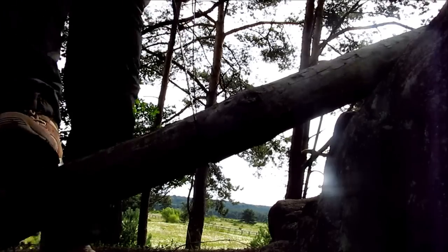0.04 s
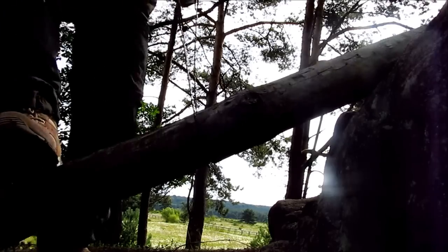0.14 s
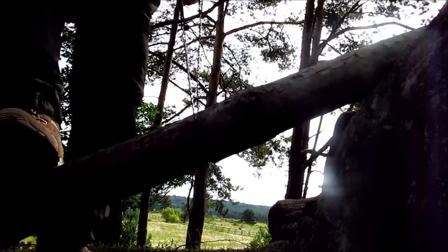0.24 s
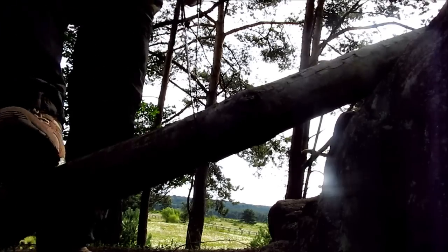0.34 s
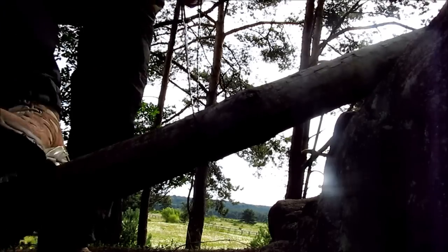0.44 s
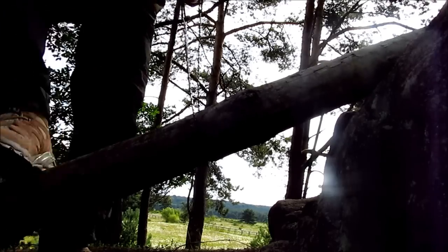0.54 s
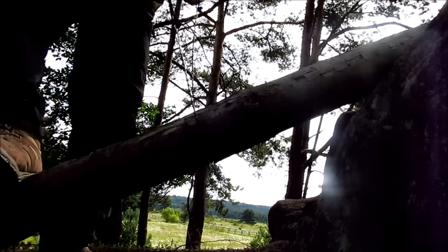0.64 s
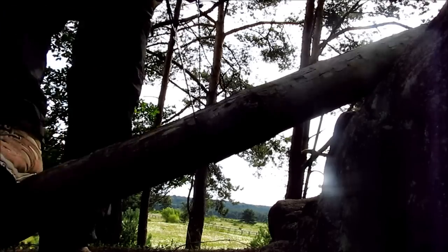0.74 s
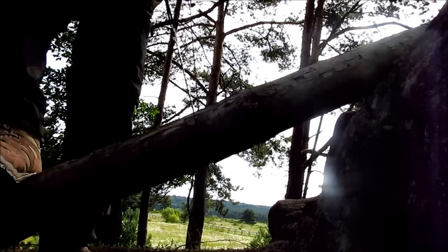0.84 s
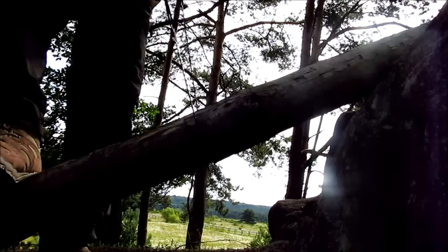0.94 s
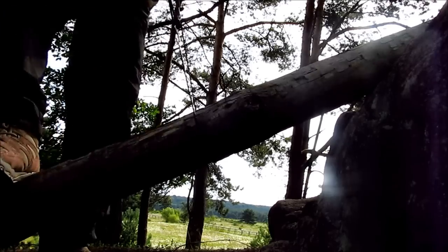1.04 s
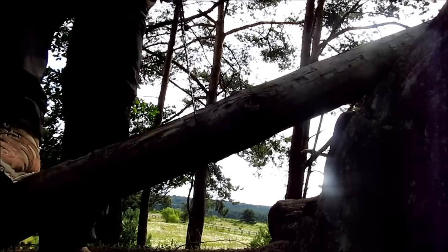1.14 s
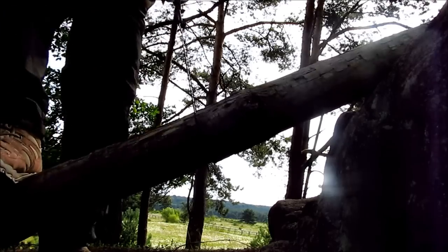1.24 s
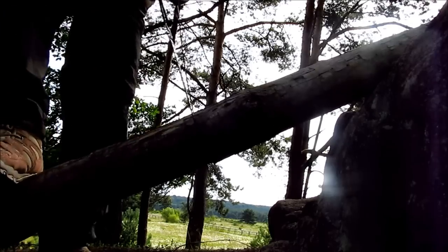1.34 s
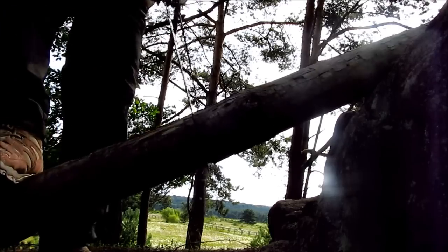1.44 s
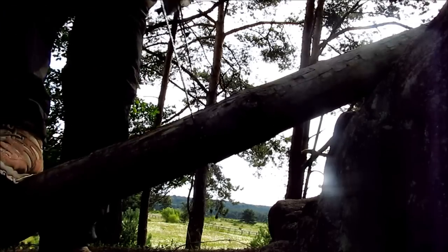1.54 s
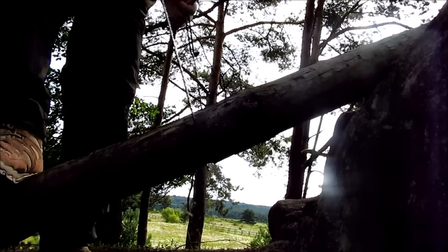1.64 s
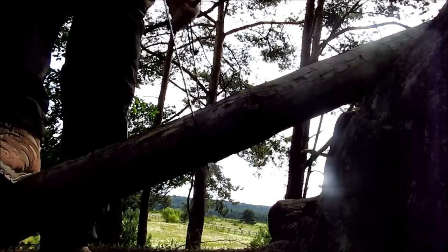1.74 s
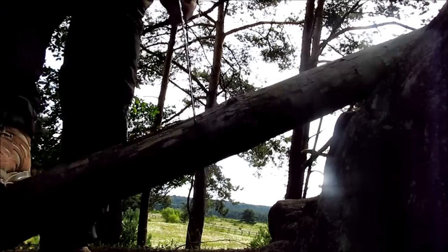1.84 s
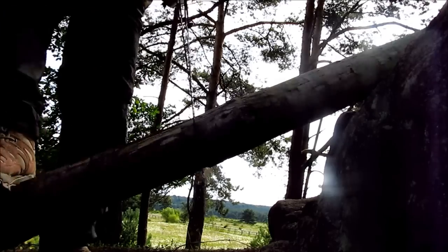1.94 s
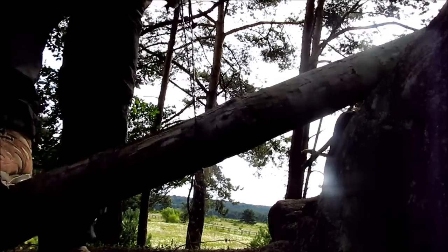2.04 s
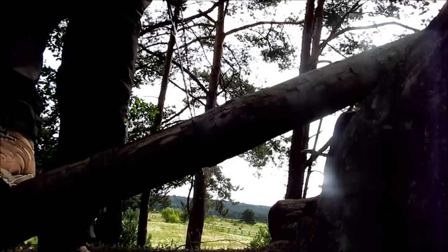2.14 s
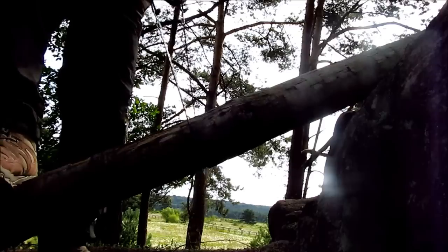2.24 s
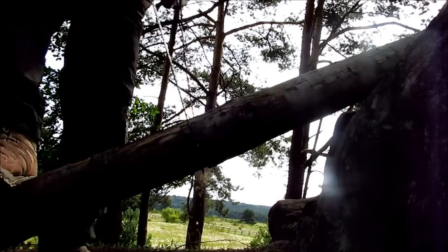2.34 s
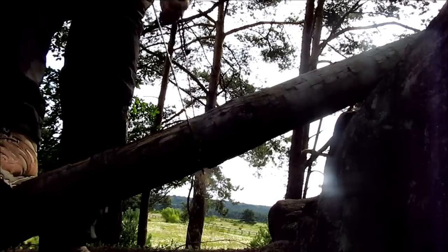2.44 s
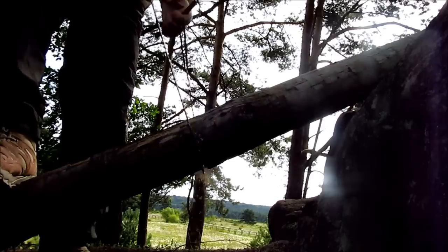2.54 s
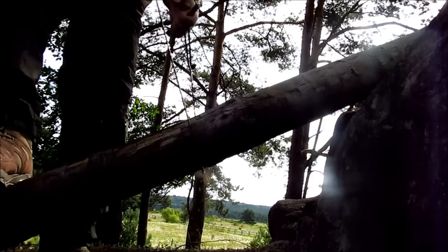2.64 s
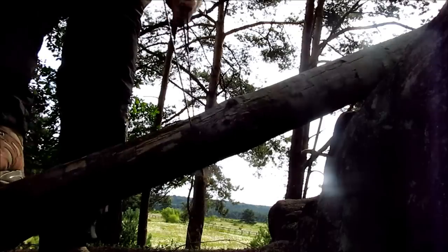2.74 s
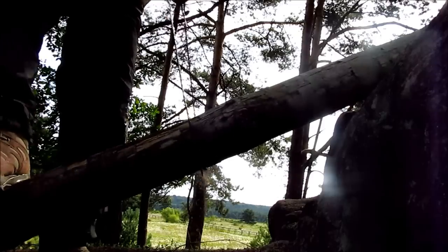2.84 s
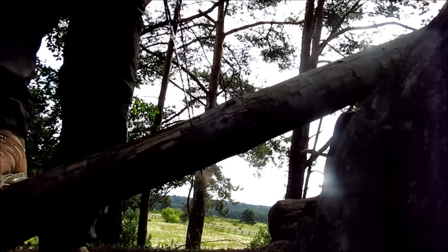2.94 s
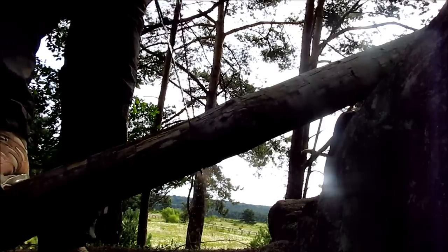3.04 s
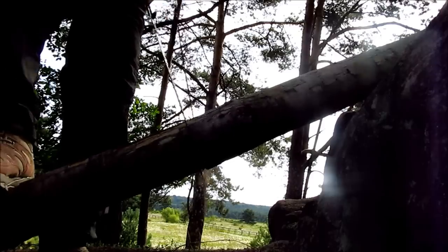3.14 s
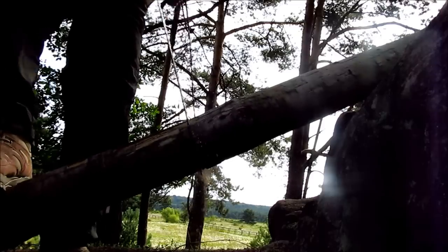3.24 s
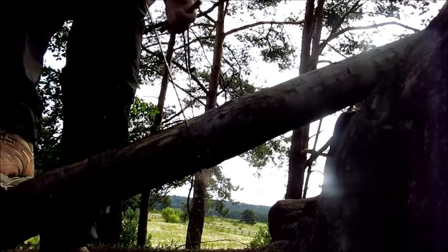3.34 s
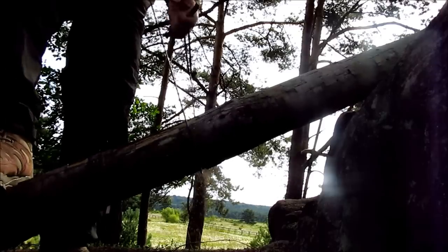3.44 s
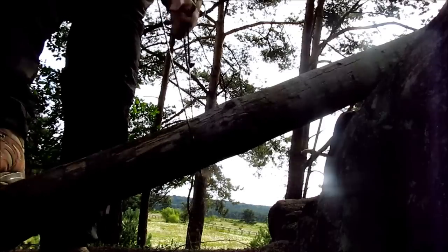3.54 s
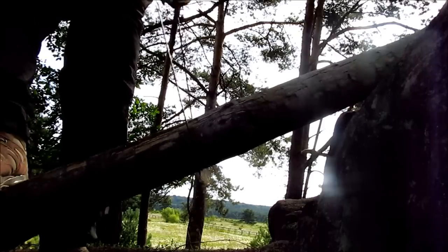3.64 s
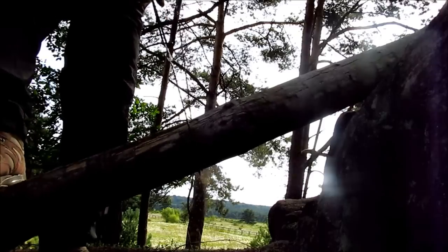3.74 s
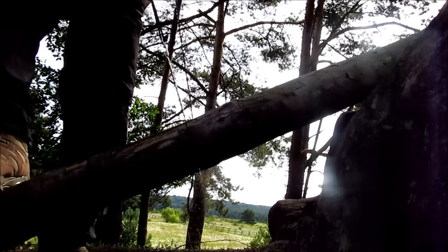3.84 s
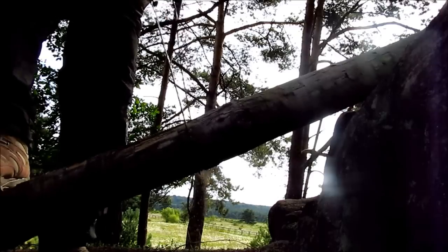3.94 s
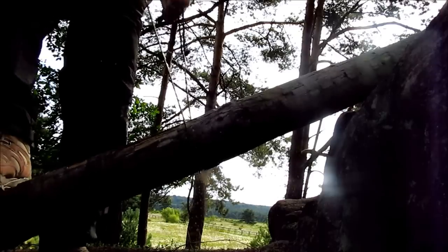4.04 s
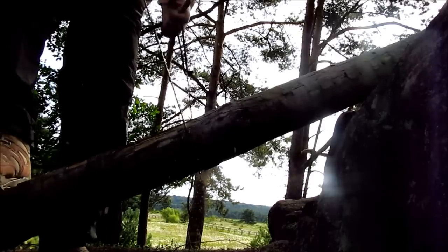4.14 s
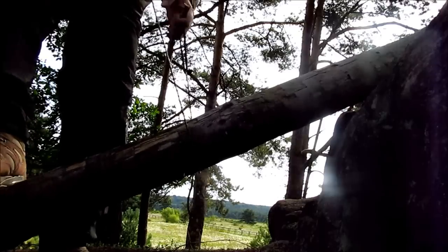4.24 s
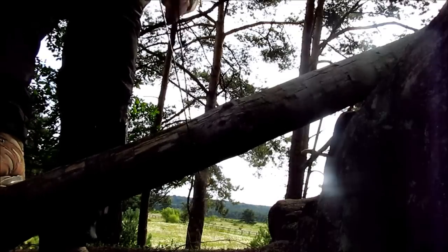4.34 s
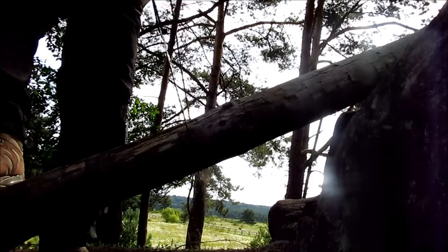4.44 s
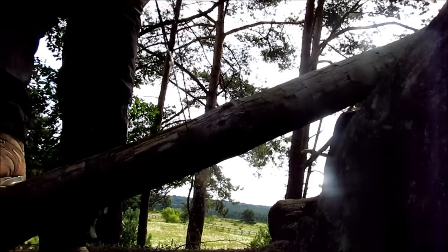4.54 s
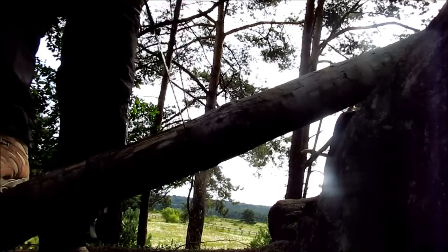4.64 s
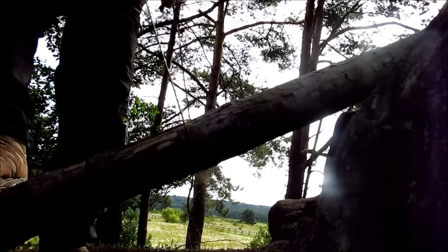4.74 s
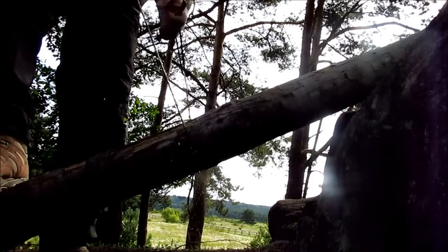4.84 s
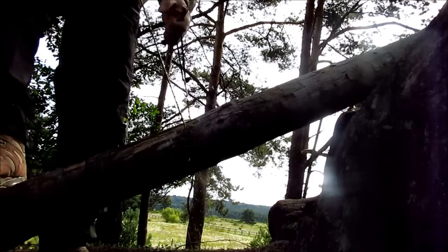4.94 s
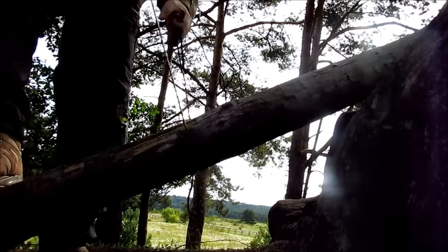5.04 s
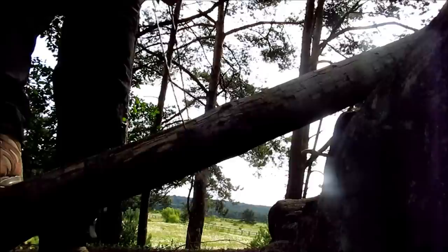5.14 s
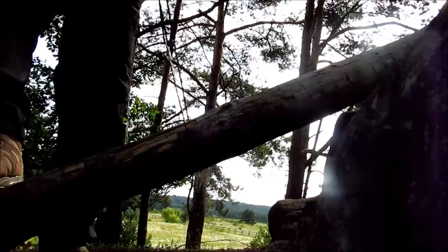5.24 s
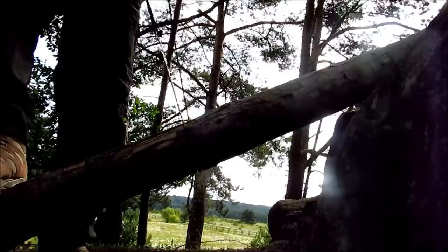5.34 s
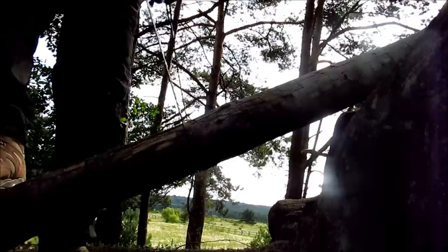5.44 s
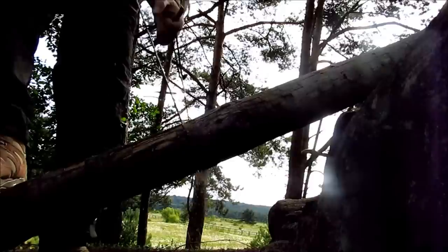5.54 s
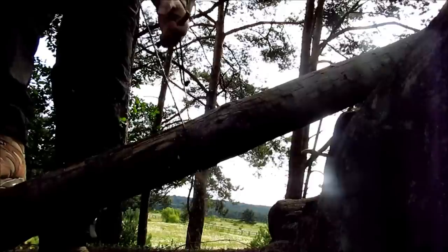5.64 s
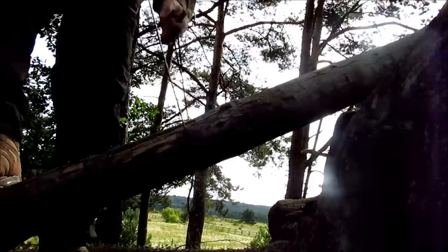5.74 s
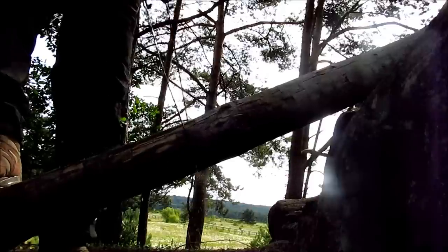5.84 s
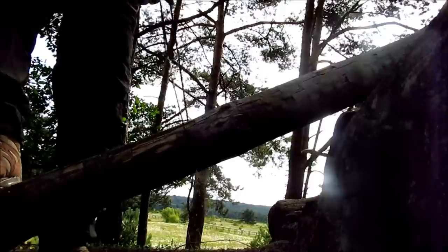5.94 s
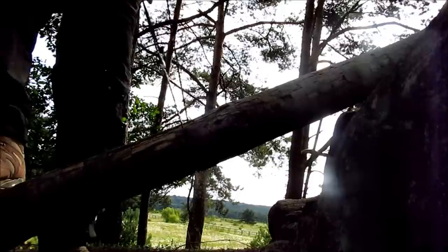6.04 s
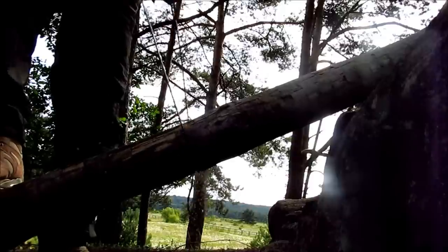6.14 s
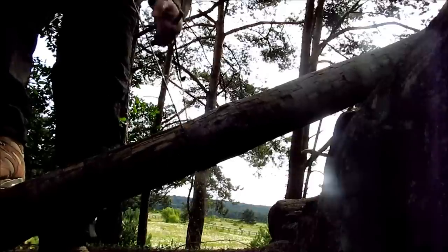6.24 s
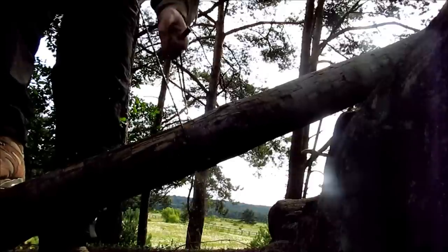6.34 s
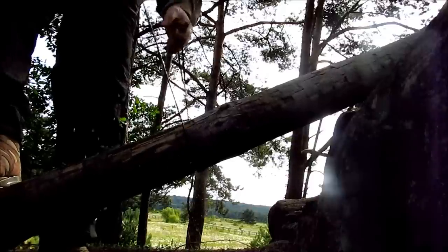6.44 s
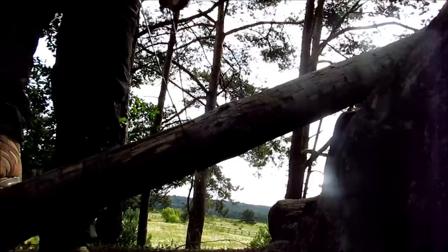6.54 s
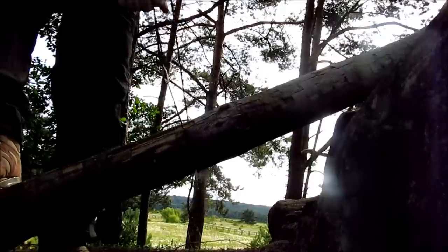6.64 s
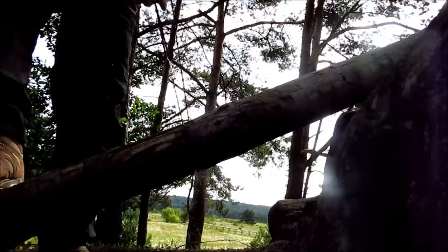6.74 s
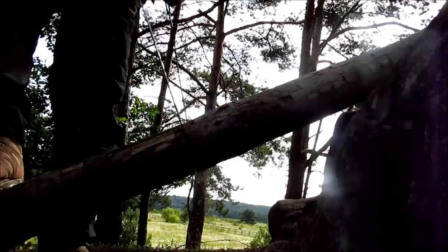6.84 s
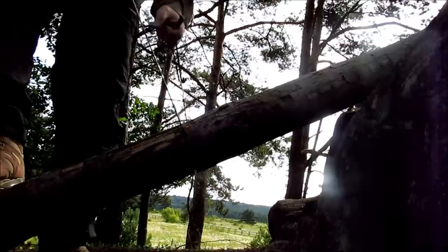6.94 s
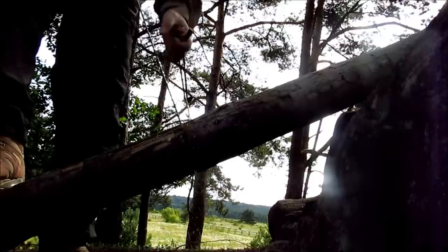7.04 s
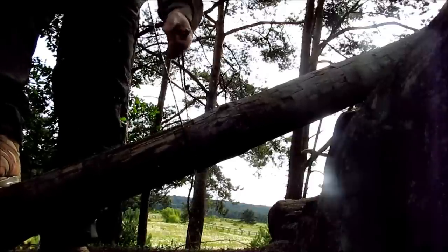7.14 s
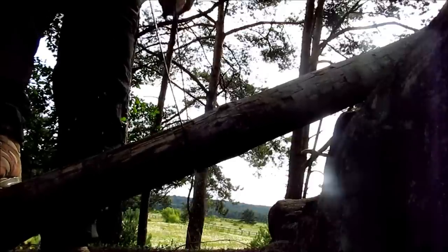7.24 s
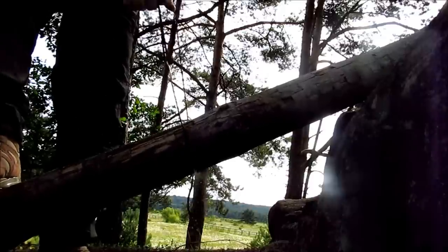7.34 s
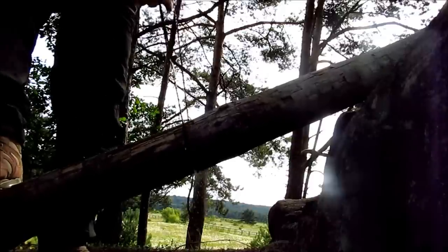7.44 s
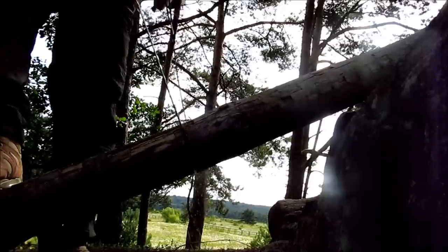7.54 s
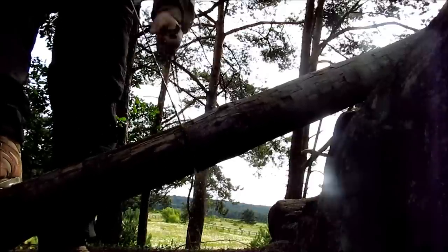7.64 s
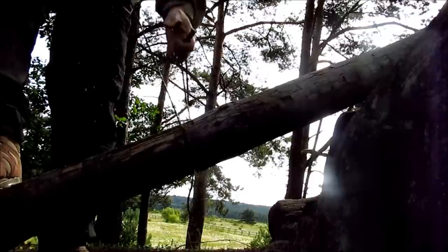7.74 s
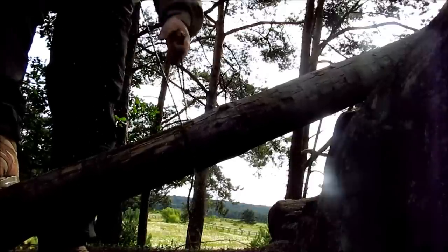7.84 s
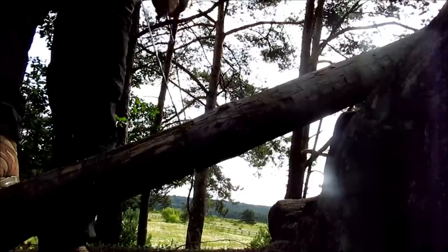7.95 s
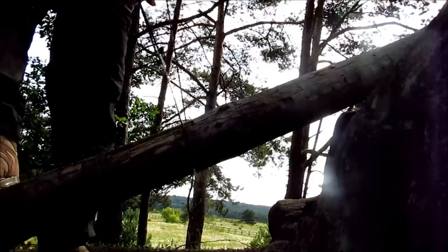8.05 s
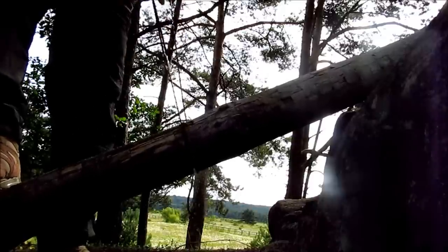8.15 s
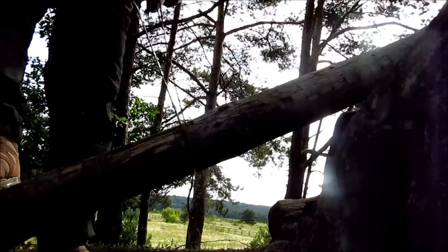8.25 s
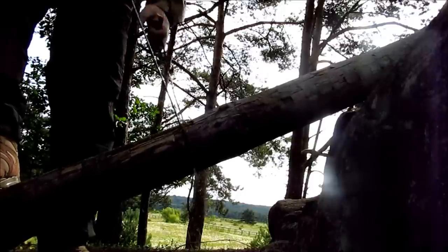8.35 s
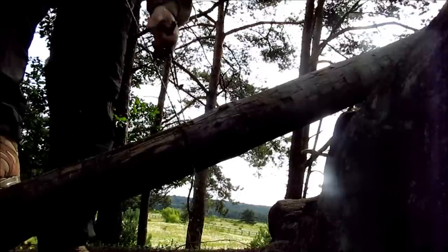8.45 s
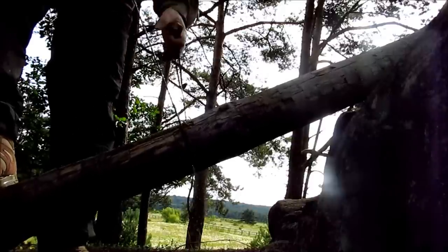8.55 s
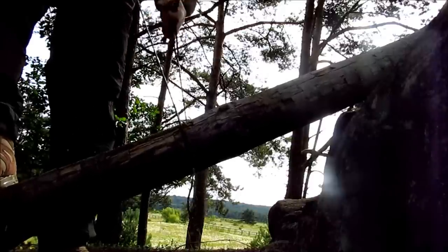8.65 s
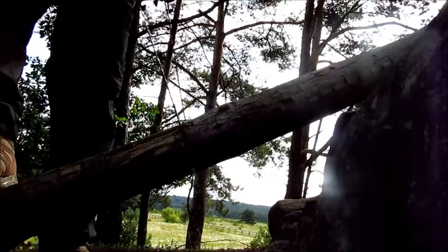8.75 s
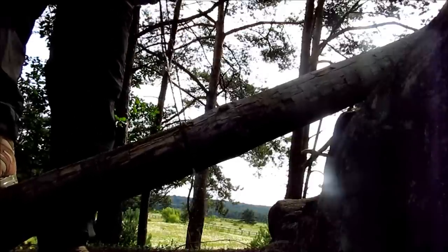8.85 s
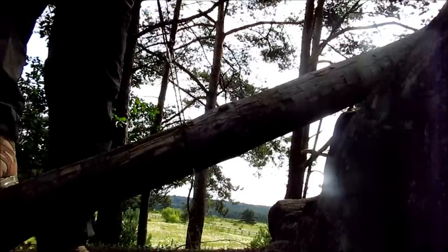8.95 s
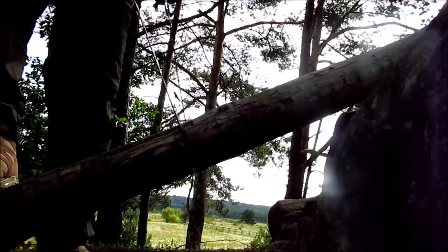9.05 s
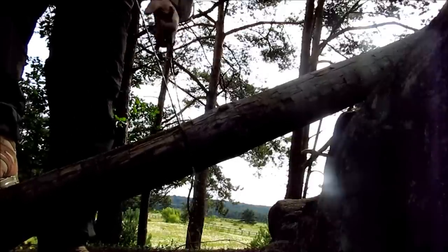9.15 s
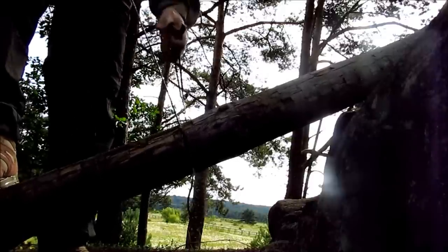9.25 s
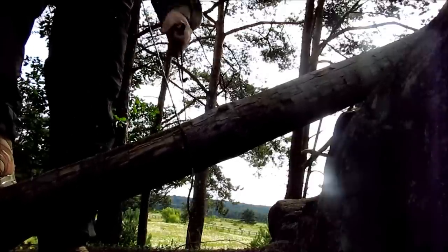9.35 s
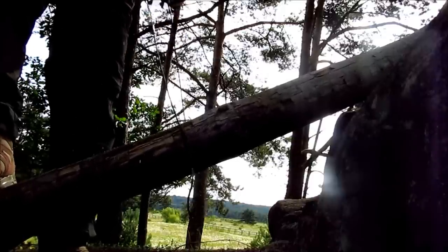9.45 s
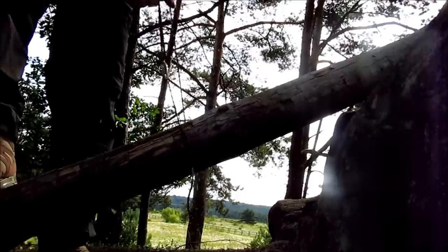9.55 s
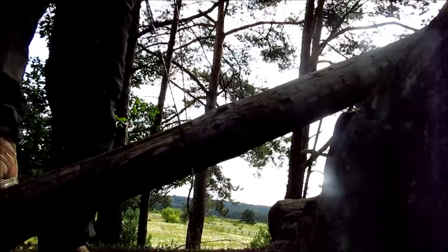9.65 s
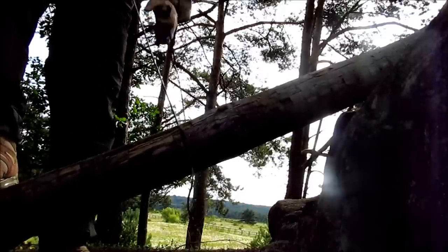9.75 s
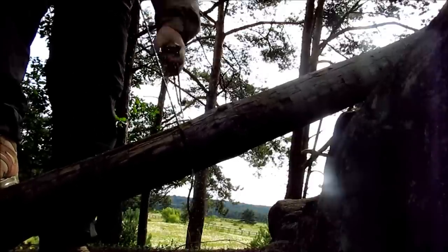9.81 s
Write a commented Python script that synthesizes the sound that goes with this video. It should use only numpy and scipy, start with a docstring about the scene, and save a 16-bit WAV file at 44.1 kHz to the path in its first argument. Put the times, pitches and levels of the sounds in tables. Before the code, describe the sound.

A quiet pine wood, heard close to a leaning log: low air murmur, soft leaf hiss and a thin insect band, fading slightly in the first four seconds. From 0 to 1.4 s a boot scuffs gritty bark, with muted knocks around 0.7 s, tiny chain ticks and dry snaps. At about 1.5 s a hand-pulled chain saw bites, jerky and bright, with hard woody knocks and sharp cracks near 1.9 and 2.4 s. Strokes of roughly a quarter second follow with short gaps, first slightly over two per second, then nearly three. Alternate pulls differ in brightness and hollowness. Each tears crackling fibres and rings the log. From 4 s the rasp becomes regular, darker and hollower, link rattle thinning. Snaps cluster around 8.3 to 8.4 s; a slower stroke follows near 8.7 s. Sawing continues to about 9.9 s, with a last knock and snaps near 9.7 s.

```python
"""In a quiet pine wood, a pocket chain saw is pulled to and fro, hand over hand, under a leaning log.
A boot is set on the log with scuffs and damped knocks; filtered noise makes leaf hiss and insects.
Each stroke then drags the teeth through the cut: impulses ring the log's modes and tear out crackling fibres.
Short bright ticks are the slack links clinking, links snapping taut and splinters breaking."""
import sys
import numpy as np
from scipy import signal
from scipy.fft import rfft, irfft
from scipy.io import wavfile
from scipy.ndimage import uniform_filter1d

SR = 44100
rng = np.random.default_rng(int(sys.argv[2]) if len(sys.argv) > 2 else 0)


def transcribe(signal):
    """Save signal, clipped to [-1, 1], as a 16-bit WAV file at the path in sys.argv[1]."""
    frames = np.atleast_2d(signal).T
    limited = np.clip(frames, -1, 1)
    pcm = np.round(limited * 32767).astype(np.int16)
    wavfile.write(sys.argv[1], SR, pcm)


N = 435708
TIME = np.arange(N) / SR
# the cut deepens quickly at first, then ever more slowly
FIRST_CUT_S, DEEPEN_S = 1.46, 3.2
# 1 on untouched bark, falling towards 0
FRESHNESS = np.exp(-np.maximum(TIME - FIRST_CUT_S, 0) / DEEPEN_S)
SLACK_DB = (2, -10.5)   # looseness of the chain: (fresh, deep)


def from_db(db):
    """Decibel definition: 20 dB is a tenfold amplitude."""
    return 10 ** (np.asarray(db) / 20)


def rms_one(x):
    """Power normalisation: each channel gets a root mean square of 1."""
    return x / np.sqrt(np.mean(x ** 2, axis=-1, keepdims=True) + 1e-20)


def with_depth(fresh, deep):
    """Exponential approach: a value moves from fresh bark to the deep cut."""
    return deep + (fresh - deep) * FRESHNESS


def drift(rate):
    """Random modulation: chance values joined by lines, `rate` a second, with spread 1."""
    knots = rng.standard_normal(N // 20)
    return rms_one(np.interp(TIME * rate, np.arange(len(knots)), knots))


def fade(x, seconds):
    """Exponential decay: every impulse leaves a tail with this time constant."""
    return signal.lfilter([1], [1, -np.exp(-1 / (seconds * SR))], x + 1e-18)


def colour(x, points):
    """Minimum-phase filtering: the cepstrum is folded to give a causal response through (Hz, dB) points."""
    size = 4096
    hz, db = np.transpose(points)
    grid = np.maximum(np.arange(size // 2 + 1) * SR / size, 1)
    gain = from_db(np.interp(np.log(grid), np.log(hz), db))
    cepstrum = irfft(np.log(gain))
    cepstrum[1:size // 2] *= 2
    cepstrum[size // 2 + 1:] = 0
    response = irfft(np.exp(rfft(cepstrum)))
    return signal.oaconvolve(np.atleast_2d(x), response[None], axes=-1)[:, :N]


def resonate(x, hz, width_hz):
    """Damped resonance: one pole pair with gain 1 on top; a wider peak dies sooner."""
    r = np.exp(-np.pi * width_hz / SR)
    zeros = np.array([1, 0, -1]) * (1 - r * r) / 2
    poles = [1, -2 * r * np.cos(2 * np.pi * hz / SR), r * r]
    return signal.lfilter(zeros, poles, x)


# spectrum of the still wood's air: pitch_hz, relative density_db (dB per Hz)
AIR_SPECTRUM = [(20, -28), (68, -11.5), (180, -12.5), (860, -19), (1250, -24.5), (3000, -28), (5200, -31),
                (6500, -34.5), (11500, -38), (16000, -46)]
# course of its level: time_s, level_db
AIR_LEVEL = [(0, -45), (1.3, -48), (2.2, -52), (3.6, -55), (4.3, -56.5), (9.88, -56.5)]


def forest(insect_hz, insect_db):
    """Broadband turbulence: a low murmur of air in the trees, wide leaf hiss, and a thin band of insects."""
    mid, side = rms_one(colour(rng.standard_normal((2, N)), AIR_SPECTRUM))
    air = np.vstack([mid, colour(side, [(100, -13), (800, -9), (2000, 0.0)])])
    insects = resonate(rng.standard_normal((2, N)), insect_hz, 700)
    insects = rms_one(resonate(insects, insect_hz, 700))
    time_s, level_db = np.transpose(AIR_LEVEL)
    return from_db(np.interp(TIME, time_s, level_db)) * (air + from_db(insect_db) * insects)


# boot and slack chain on the bark: start_s, length_s,
#   level_db (of the gritty noise, before its rise and decay), lowest_hz, highest_hz
BARK_SCUFFS = [(0.003, 0.021, -39.5, 2190, 4000), (0.127, 0.022, -27.5, 1490, 3280),
               (0.128, 0.023, -31.5, 328, 865), (0.152, 0.066, -44, 700, 5000),
               (0.505, 0.021, -43.5, 900, 2320), (0.706, 0.073, -40.5, 700, 7800),
               (0.806, 0.11, -47.5, 890, 5900), (2.152, 0.024, -47, 1476, 4100),
               (0.026, 0.2, -45.5, 261, 617)]


def scuffs(grain_db, tail):
    """Sliding friction: short gritty noise over bark; the longer the slide, the longer it takes to die."""
    out = np.zeros((2, N))
    grit = from_db(grain_db * drift(700)) * rng.standard_normal((2, N))
    for start, length, level_db, low_hz, high_hz in BARK_SCUFFS:
        span = slice(int(start * SR), int((start + length + 0.23) * SR))
        t = TIME[span] - TIME[span][0]
        rise = np.minimum(t / 0.0098, 1)
        decay = np.exp(-np.maximum(t - length, 0) / (tail * length))
        band = signal.butter(2, [low_hz, high_hz], "band", fs=SR, output="sos")
        out[:, span] += from_db(level_db) * rise * decay * rms_one(signal.sosfilt(band, grit[:, span]))
    return out


# boot and catching teeth knocking the log: start_s, level_db (peak of the ring alone), pitch_hz
LOG_KNOCKS = [(0.694, -27, 151), (0.697, -25, 375), (0.749, -25, 1490), (1.486, -12, 500), (1.503, -7, 415),
              (1.695, -6, 510), (1.809, -33, 453), (1.863, -21.5, 1480), (2.018, -7, 1040),
              (2.384, -13, 930), (2.490, -8.5, 1150), (2.555, -7.5, 595), (2.665, -12.5, 1540),
              (2.847, -13.5, 982), (3.643, -29, 1100), (4.046, -14, 900), (4.833, -9.5, 508.4),
              (5.209, -17, 1699), (5.264, -6, 1502), (5.764, -36, 402.4), (5.844, -15, 900),
              (6.018, -9.5, 507), (6.920, -15, 510), (7.319, -10, 900), (9.724, -14, 1204)]


def knocks(cycles, crack_db):
    """Heavily damped impact: a ring dies within a few cycles, begun by a short crack an octave above."""
    out = np.zeros(N)
    for start, level_db, hz in LOG_KNOCKS:
        span = slice(int(start * SR), int((start + .1) * SR))
        turns = (TIME[span] - TIME[span][0]) * hz
        swell = turns / cycles * np.exp(1 - turns / cycles)
        ring = np.sin(2 * np.pi * turns) * swell
        crack = resonate(rng.standard_normal(len(turns)), 2 * hz, 2 * hz)
        crack = rms_one(crack) * np.exp(-turns / 2)
        out[span] -= from_db(level_db) * (ring + from_db(crack_db) * crack)
    return out * [[1], [0]]   # mid only


# spectrum of every tick, clinking or snapping: pitch_hz, relative density_db (dB per Hz)
TICK_SPECTRUM = [(100, -42), (400, -17), (1200, -4), (2500, -16.5), (4000, -5), (7000, -6.5), (11000, -12),
                 (16000, -22)]


def rattle(per_s, level_db, idle_db):
    """Random (Poisson) impacts: loose links tick faintly before the sawing, then less and less in the cut."""
    strength = from_db(5 * np.clip(rng.standard_normal(N), -2, 2))
    ticks = (rng.random(N) < per_s / SR) * strength
    slack_db = np.where(TIME < FIRST_CUT_S, idle_db, with_depth(*SLACK_DB))
    ticks = fade(ticks * from_db(level_db + slack_db), 0.00057)
    return colour(ticks * rng.standard_normal((2, N)), TICK_SPECTRUM)


# links snapping taut and bark or splinters breaking: start_s, level_db (relative)
SNAP_TIMES = [(0.5217, -23), (0.7276, -19), (0.75, -10.5), (0.767, -18), (0.859, -15.5), (0.8724, -15),
              (1.415, -15), (1.4615, -5.5), (1.863, -17), (1.9203, 0), (1.930, -2), (1.948, -1),
              (2.3003, -17), (2.3424, -6), (2.4114, 0.5), (2.832, -16), (3.2419, -15), (3.2755, -5),
              (3.6395, -6), (4.749, -16), (5.1154, -17), (6.53, -17.5), (6.873, -7.5), (8.2663, -5.5),
              (8.288, -9), (8.362, -1), (8.3937, -3.5), (8.408, -6), (9.0532, -16), (9.074, -8.5),
              (9.7223, -12), (9.758, -10)]


def snaps(ring_s, level_db, tail_db):
    """Sudden release of strain: sharp bright cracks of about a millisecond with a faint tail."""
    clicks = np.zeros(N)
    for start, snap_db in SNAP_TIMES:
        clicks[round(start * SR)] = from_db(snap_db + level_db)
    # two decays in a row give a rounded rise, scaled back to the peak of the click
    crack = fade(fade(clicks, ring_s), ring_s) * np.e / (ring_s * SR)
    burst = crack + from_db(tail_db) * fade(clicks, 0.0028)
    return colour(burst * rng.choice([-1., 1.], (2, N)), TICK_SPECTRUM)


def teeth(speed, full_rate, jitter):
    """Impulse train: one hit per tooth, faster with the chain and unevenly spaced; equal power at any speed."""
    rate = full_rate * speed * np.exp(jitter * drift(300))
    passed = np.floor(np.cumsum(rate) / SR)
    hits = np.diff(passed, prepend=0)
    power = uniform_filter1d(hits ** 2, int(0.011 * SR))
    return hits / np.sqrt(power.clip(1e-6))   # the hand's pull evens out the load


def links(speed, full_rate, jitter, depth_db):
    """Amplitude modulation: the load swells as each link rolls in; a slow chain ticks, a fast one blurs."""
    turns = np.cumsum(full_rate * np.sqrt(speed) * np.exp(jitter * drift(80))) / SR
    swing_db = np.minimum(depth_db / speed ** 3, 10.5)
    mean_power = np.i0(swing_db * np.log(10) / 10)
    return from_db(swing_db * np.sin(2 * np.pi * turns)) / np.sqrt(mean_power)


def wood(push, modes, restless_db):
    """Modal response: a push rings damped modes whose shares wander as the teeth move; power is kept."""
    out, power = 0, 0
    for hz, width_hz, level_db in modes:
        # a random sign on every sample spreads the push over all pitches
        share = rng.choice([-1., 1.], (2, N)) * from_db(level_db + restless_db * drift(30))
        out = out + resonate(resonate(push * share, hz, width_hz), hz, width_hz)
        power = power + np.mean(share ** 2) * np.pi * width_hz / (2 * SR)
    return out / np.sqrt(power)


# spectrum of torn fibres before the band balance: pitch_hz, relative density_db (dB per Hz)
FIBRE_SPECTRUM = [(900, -21.5), (1800, 2.5), (2500, -0.5), (3300, 3.5), (4200, -1.5), (5200, -2.5),
                  (7000, -6), (9000, -8), (12000, -13), (16000, -22.5)]


def fibres(hits, rasp_db, sizzle_db, tear_s, splinters_per_s, splinter_db):
    """Brittle fracture: behind each tooth fibres part in tiny cracks; now and then a whole splinter goes."""
    size = np.minimum(rng.exponential(1, N), 3.5)
    splinters = (rng.random(N) < splinters_per_s / SR) * size
    bursts = rms_one(fade(hits, tear_s)) + from_db(splinter_db) * rms_one(fade(splinters, 0.00034))
    cracks = rms_one(colour(bursts * rng.standard_normal((2, N)), FIBRE_SPECTRUM))
    # a shallow cut lets the treble out, a deep one muffles it; every crack has a colour of its own
    bands = [([500, 2700], 0), ([2700, 4400], 0), ([4400, 7700], rasp_db), ([7700, 17000], sizzle_db)]
    out, power = 0, 0
    for k, (edges_hz, level_db) in enumerate(bands):
        sos = signal.butter(3, edges_hz, "band", fs=SR, output="sos")
        band = signal.sosfilt(sos, cracks[::(-1) ** k])   # neighbours get unrelated cracks
        band = band * from_db(0.45 * drift(380))
        out = out + from_db(level_db) * band
        power = power + from_db(level_db) ** 2 * np.mean(band ** 2)
    return out / np.sqrt(power)


# strokes, the hands taking turns: start_s (of the bite), take_up_s (before it), length_s,
#   hardest_share (moment of hardest pull, share of length), then relative levels:
#   bite_db (teeth), tear_db (fibres), flex_db (bending log), hollow_db (body against cut)
PULL_STROKES = [(1.468, .05, .292, .55, -17, -23.5, -19.5, 1.5),
                (1.911, 0.065, .172, .62, -21.5, -27, -16, -3),
                (2.354, 0.049, 0.3, 0.64, -17.5, -25.5, -23.5, 1),
                (2.838, .053, 0.25, 0.22, -19, -24, -12.5, -1),
                (3.27, .028, 0.22, 0.19, -16.5, -23, -22.5, 1),
                (3.652, .045, 0.21, 0.39, -18.5, -24.2, -17, -3),
                (4.026, .045, 0.21, .19, -16.5, -26.5, -24.5, 1),
                (4.415, .030, .196, 0.49, -16.5, -24.5, -21.5, -3.5),
                (4.754, 0.044, 0.24, 0.22, -18, -28, -24.5, 1.5),
                (5.149, 0.036, 0.21, .46, -17.5, -25.5, -16, -0.5),
                (5.485, 0.036, 0.22, 0.36, -16, -26.5, -34, 1),
                (5.84, .040, 0.22, 0.51, -19, -26.7, -19, -2.5),
                (6.19, 0.031, 0.23, 0.35, -15.5, -25.5, -30, 1),
                (6.554, 0.037, 0.21, 0.46, -17, -26, -20.5, -2),
                (6.896, .024, 0.22, 0.28, -15, -26.5, -28.5, 1.5),
                (7.259, .035, .222, .66, -19.5, -29.5, -22, -2),
                (7.59, 0.039, 0.22, 0.56, -14.5, -26.5, -36, 1),
                (7.951, .025, .227, 0.56, -19.5, -30.5, -23, -2),
                (8.286, .020, 0.23, 0.46, -17, -28.5, -30, 2), (8.707, .050, 0.27, .51, -21.5, -33, -19, 0),
                (9.083, 0.031, 0.25, 0.43, -15.5, -26.5, -25, 1),
                (9.444, 0.046, .210, 0.44, -19, -27.5, -21, -2),
                (9.732, 0.016, 0.23, .28, -15.5, -26, -35, 1)]
CATCH_S, CATCH_DB = 0.004, 11   # the level steps up by this much as the slack chain catches
SLIDE_DB_PER_S = 200   # the loose chain gathers speed


def pulls(levels_db, start_db, end_db, attack_db_per_s, release_db_per_s, slide_db):
    """Force envelope: the chain catches and slides, grips, arches up to its hardest pull, eases and stops."""
    out = np.zeros(N)
    for (start, take_up, length, hardest, *_), level_db in zip(PULL_STROKES, levels_db):
        span = slice(int((start - .15) * SR), int((start + length + .15) * SR))
        t = TIME[span] - start
        top = np.clip(hardest, .05, .95)
        along = np.clip(t / length, 0, 1)
        rise_db = start_db[span] * (1 - along / top) ** 2
        ease_db = end_db[span] * ((along - top) / (1 - top)) ** 2
        arch_db = np.where(along < top, rise_db, ease_db)
        stop_db = attack_db_per_s * np.maximum(-t, 0) + release_db_per_s * np.maximum(t - length, 0)
        loose_s = np.maximum(-t - take_up, 0)   # time still to go before the catch
        slide = from_db(slide_db[span] - SLIDE_DB_PER_S * loose_s) * (1 - along)
        catch = from_db(-CATCH_DB * np.minimum(loose_s / CATCH_S, 1))
        out[span] += (from_db(level_db + arch_db - stop_db) + slide) * catch
    return out


KERF_HZ, KERF_WIDTH_HZ = (7000, 3100), 1100   # pitch of the slot: (fresh, deep)
KERF_SHARE = (0.064, 0.36)   # (first hand, other hand)


def kerf(cracks):
    """Cavity resonance: the slot rings with the tearing, lower every stroke and more for one hand."""
    out, ring_hz = cracks.copy(), with_depth(*KERF_HZ)
    for k, (start, take_up, length, *_) in enumerate(PULL_STROKES):
        span = slice(int((start - take_up) * SR), int((start + length + .04) * SR))
        ringing = resonate(cracks[:, span], ring_hz[span.start], KERF_WIDTH_HZ)
        out[:, span] = rms_one(cracks[:, span] + KERF_SHARE[k % 2] * ringing)
    return out


# bending of the whole log: pitch_hz, width_hz (of each of two passes), level_db (relative)
BENDING_MODES = [(79.4, 17, -0.5), (111.7, 33, 5), (137, 30, 0.5)]
# the uncut core: pitch_hz, width_hz, level_db, likewise
UNCUT_MODES = [(173, 92, -6.5), (238, 70, 2.5)]
# the log's body: pitch_hz, width_hz, level_db, likewise
LOG_MODES = [(335, 32.6, -4.5), (371.3, 94, 1.5), (439, 167, -1), (518, 196, -1), (630, 138, -1.5)]
# the wood round the cut: pitch_hz, width_hz, level_db, likewise
RIM_MODES = [(920, 115, 1), (1067, 250, 2), (1310, 200, -0.5), (1566, 287, -2), (2090, 2400, -14.5)]
CORE_DB, RASP_DB, SIZZLE_DB = (-9.5, -14), (6.5, 1), (6, -0.5)   # (fresh, deep)
# the first hand sounds brighter: added for one, taken off for the other
HAND_RASP_DB, HAND_SIZZLE_DB = 0.8, 1.5
TAKE_UP_DB = -41   # before the teeth bite, the chain slides taut over the wood; slack is added


def saw():
    """Forced vibration: teeth knock the log's modes and rip fibres in mid and side, stroke by stroke."""
    starts, take_ups, _, _, bites_db, tears_db, flexes_db, hollows_db = np.transpose(PULL_STROKES)
    slide_db = TAKE_UP_DB + with_depth(*SLACK_DB)
    bite = pulls(bites_db, start_db=with_depth(-5.0, -12.0), end_db=with_depth(-6.0, -12.5),
                 attack_db_per_s=850, release_db_per_s=800, slide_db=slide_db - 12)
    tear = pulls(tears_db, start_db=with_depth(0.5, -8.0), end_db=with_depth(-7.5, -13.0),
                 attack_db_per_s=510, release_db_per_s=893, slide_db=slide_db)
    snag_db = with_depth(2.0, 0.5) * drift(35)   # the chain runs jerkily until it has a groove
    bite_db = 20 * np.log10(bite + 1e-4) + snag_db
    stroke = np.maximum(np.searchsorted(starts - take_ups, TIME) - 1, 0)
    hand = (-1) ** stroke

    # a stronger bite goes with a faster chain
    speed = np.clip(from_db(.16 * (bite_db + 16)), .3, 1.1)
    hits = teeth(speed, full_rate=350, jitter=.35)
    hits = hits * links(speed, full_rate=85, jitter=.22, depth_db=2.0)
    force = rms_one(fade(hits, 0.00054))
    push = force * from_db(bite_db + 0.03)

    # hollowness shares the push's power between the log's body and the wood round the cut
    hollow = from_db(hollows_db[stroke] + 2.04)
    boom = push * hollow / np.hypot(hollow, 1)
    body = wood(boom, LOG_MODES, restless_db=0.5)
    core = wood(boom * from_db(with_depth(*CORE_DB)), UNCUT_MODES, restless_db=-1.0)
    cut = wood(push / np.hypot(hollow, 1), RIM_MODES, restless_db=2.5)
    flex_db = flexes_db[stroke] - 7.5 + 0.63 * bite_db
    flex = wood(force * from_db(flex_db), BENDING_MODES, restless_db=3.5)

    rasp_db = with_depth(*RASP_DB) + hand * HAND_RASP_DB
    sizzle_db = with_depth(*SIZZLE_DB) + hand * HAND_SIZZLE_DB
    torn = kerf(fibres(hits, rasp_db, sizzle_db, tear_s=0.0045, splinters_per_s=160, splinter_db=-8.0))
    return body + core + cut + flex + tear * from_db(snag_db - 1.46) * torn


# gain of the side channel for all but the forest: pitch_hz, gain_db
SIDE_GAIN = [(100, -38), (350, -15.5), (630, -33), (730, -3.5), (820, 7), (950, -11.5), (1080, -14),
             (1300, -10.5), (1650, -8), (2150, -3.5), (3200, -8.5), (5000, -3.5), (8000, -1), (16000, -3.5)]
# the left ear against the middle: pitch_hz, gain_db
LEFT_GAIN = [(60, 0.5), (300, -1), (550, -0.9), (820, 2), (1300, -1.5), (2500, 0.5), (5000, 0.5),
             (8000, 0.5), (13000, 2)]


def scene():
    """Mid-side superposition: the bass of the log is central; the treble scatters off trunks and ground."""
    touches = snaps(ring_s=0.00062, level_db=-5.5, tail_db=-9.5)
    touches = touches + scuffs(grain_db=2.5, tail=0.35) + knocks(cycles=0.59, crack_db=-8.5)
    mid, side = saw() + touches + rattle(per_s=73, level_db=-37, idle_db=-5)
    near = np.vstack([mid, colour(side, SIDE_GAIN)])
    mid, side = near + forest(insect_hz=5730, insect_db=-15.5)
    lean = colour(mid, LEFT_GAIN)[0] - mid   # added on the left, taken off on the right
    return np.array([mid + side + lean, mid - side - lean])


def record(dry):
    """Filtering and saturation: a narrow notch dents the treble, peaks are rounded and the top is cut."""
    notched = dry - .7 * resonate(dry, 7900, 170)
    rounded = 1.316 * np.tanh(notched / 1.252)
    low_pass = signal.ellip(10, .2, 80, 16000, fs=SR, output="sos")   # 0.2 dB ripple, 80 dB down, edge in Hz
    return signal.sosfilt(low_pass, rounded)


dry = scene()
out = record(dry)
transcribe(out)
```